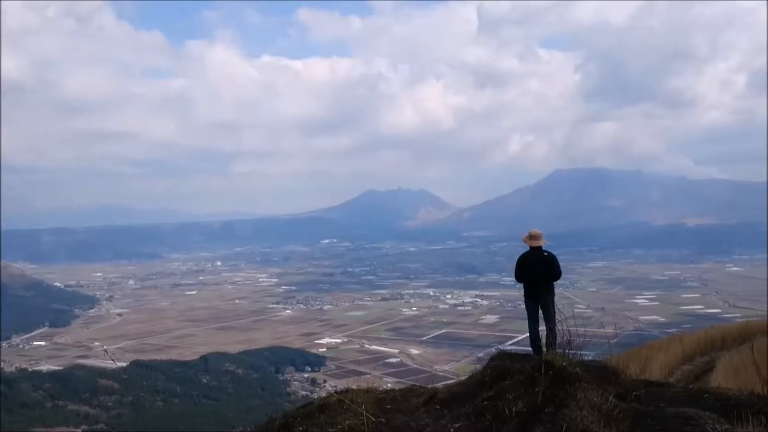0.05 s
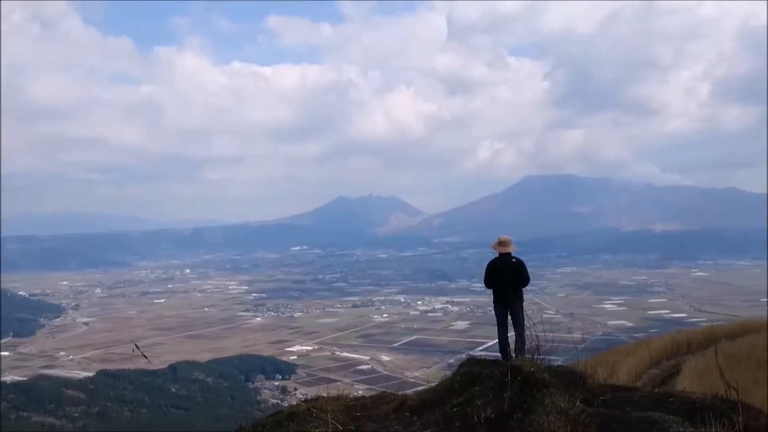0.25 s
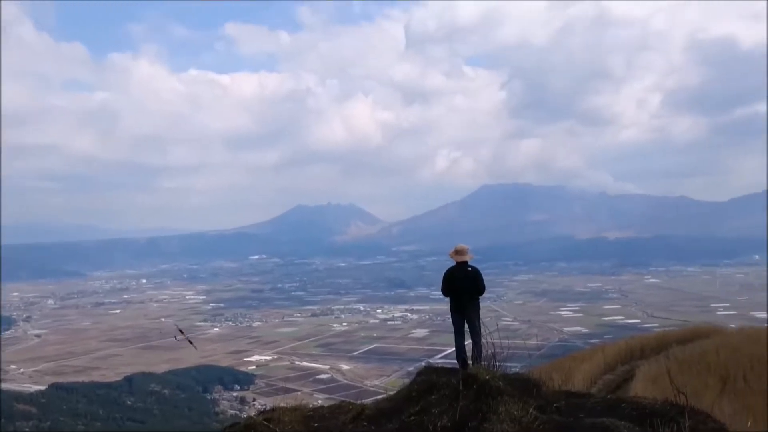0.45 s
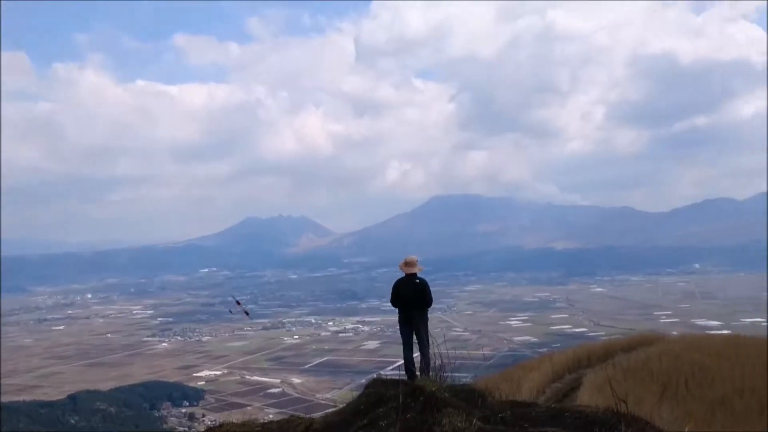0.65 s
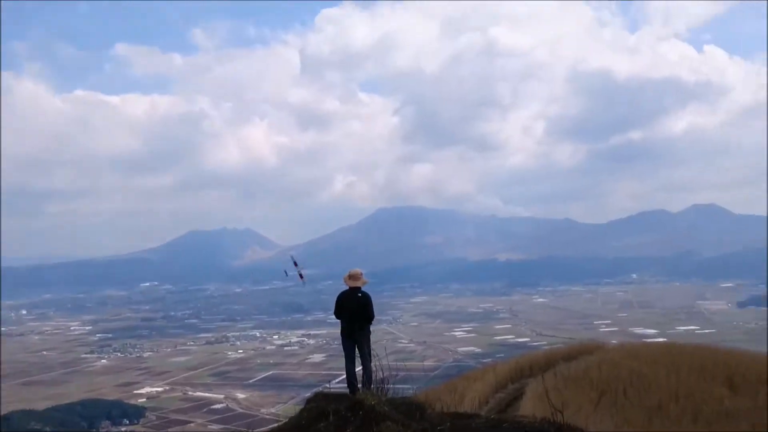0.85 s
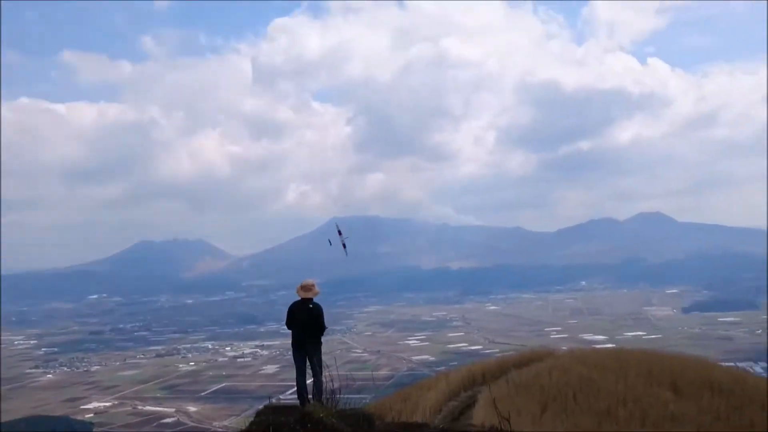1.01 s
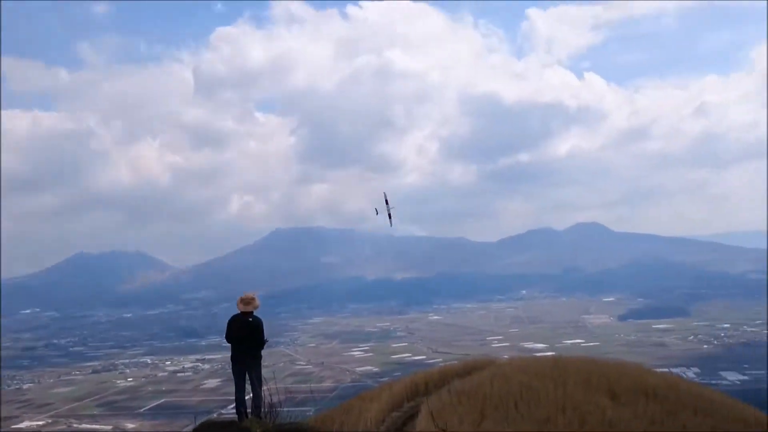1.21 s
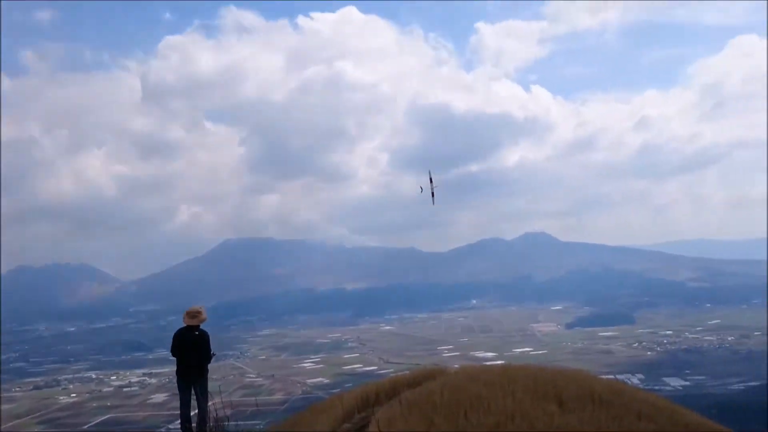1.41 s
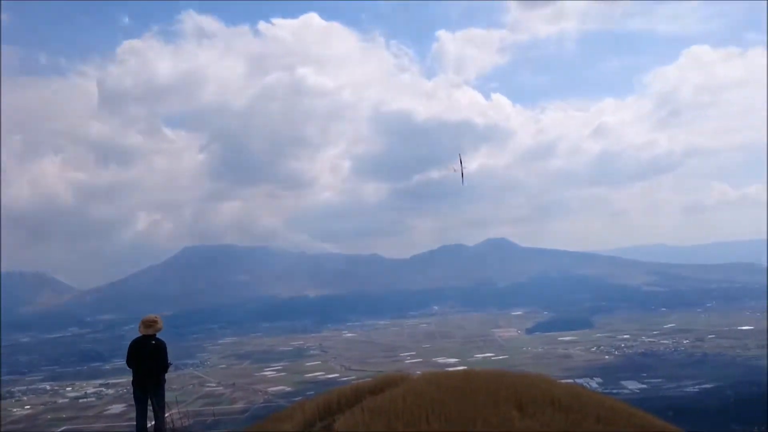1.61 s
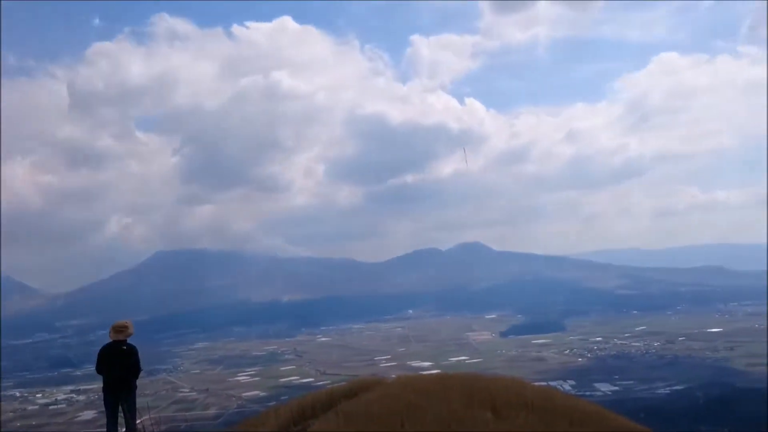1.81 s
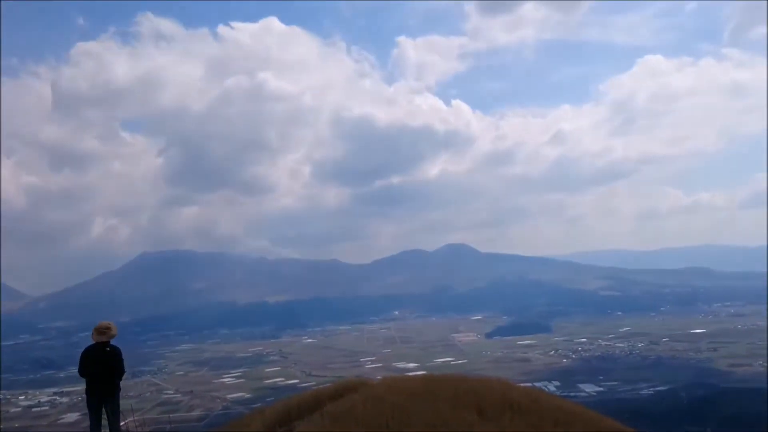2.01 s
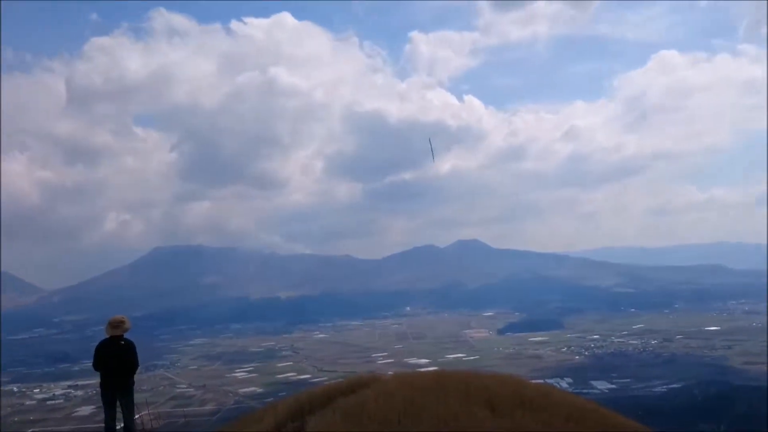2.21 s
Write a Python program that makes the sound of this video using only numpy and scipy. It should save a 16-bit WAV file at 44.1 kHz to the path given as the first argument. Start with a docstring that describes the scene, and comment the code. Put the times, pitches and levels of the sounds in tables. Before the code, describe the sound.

A model glider whooshes past on the right, its airy rush building in quick surges from about 0.2 seconds. High, brief whistles ride on it, loudest near 0.65 seconds and sinking in pitch. Around 1.7 seconds the main whistle returns lower and the rush dies down. A faint puff of wind touches the microphone near 1.9 seconds as the glider fades into soft wind hiss and a faint low drone.

```python
"""A small model glider sweeps past a windy hilltop and climbs away, heard on the right.
From the start, air rushes over its wings in surges, above a soft wind hiss and a faint low drone.
Edges and gaps whistle in the flow, loudest near 0.65 s, sinking in pitch as it passes and slows.
Near 1.7 s the main whistle returns lower and the rush dies down. A puff of wind meets the
microphone near 1.9 s, and the glider fades into the hiss."""
import sys
import numpy as np
from scipy import signal
from scipy.fft import next_fast_len
from scipy.io import wavfile
from scipy.ndimage import uniform_filter1d, map_coordinates

SR = 44100
rng = np.random.default_rng(int(sys.argv[2]) if len(sys.argv) > 2 else 0)


def dump_mix(stems):
    """Bounce the given channels to the path in sys.argv[1] as a 16-bit WAV at rate SR."""
    frames = np.atleast_2d(stems).T  # one column per channel
    limited = np.clip(frames, -1, 1)  # hard clip at full scale
    pcm = np.round(limited * 32767).astype(np.int16)
    wavfile.write(sys.argv[1], SR, pcm)


N = 103635
T = np.arange(N) / SR

# Surges of the rush in three parts, as relative levels: time_s, low_db, middle_db, treble_db
RUSH_SURGES = [(0.0, -87, -49, -58), (0.07, -65, -59, -54.5), (0.105, -80, -61, -61.5),
               (0.16, -58, -54.5, -57.5), (0.225, -62, -47, -52.5), (0.26, -45.5, -39.5, -48.5),
               (0.32, -48, -48, -54), (0.39, -41, -43, -54), (0.44, -61, -42.0, -49.5),
               (0.485, -37, -39.5, -53.5), (0.53, -46.5, -51.0, -57.5), (0.58, -43, -46.5, -53.5),
               (0.63, -40, -39.5, -49.5), (0.67, -45, -32.0, -43), (0.72, -44, -43.5, -52.5),
               (0.77, -48, -40, -54.0), (0.82, -46.5, -49.5, -53.5), (0.86, -33.5, -36, -51.5),
               (0.915, -52, -47.5, -56), (0.965, -35.5, -44.5, -54), (1.01, -39.5, -43.5, -53.5),
               (1.06, -43, -41, -54), (1.12, -51, -45.5, -55), (1.2, -52, -46, -59),
               (1.26, -47, -40.5, -52.5), (1.3, -47.5, -44, -56), (1.37, -50.5, -43, -55.0),
               (1.425, -39, -48.5, -54), (1.485, -54, -47.5, -59), (1.575, -43.5, -45.5, -58),
               (1.63, -48.5, -47, -63), (1.68, -46, -45.5, -56), (1.75, -64.5, -59.5, -68),
               (1.86, -69, -60, -65), (1.96, -75, -62.5, -67), (2.17, -77.0, -67.5, -71.5),
               (2.35, -77.0, -63.5, -74.5)]
# Centres of those three parts: centre_hz
RUSH_CENTRES_HZ = [1720, 2564, 3930]
# Spectral envelope of the rush: frequency_hz, gain_db
RUSH_SPECTRUM = [(800, -27.5), (1000, -22.5), (1200, -15), (1400, -5.5), (1600, -1.5), (1850, 2),
                 (2200, 0.5), (2600, 1), (2950, 1), (3200, 1), (3480, -3), (3900, 0), (4200, -6),
                 (4550, -5.5), (5000, -14), (5400, -12), (5900, -30.5), (7500, -28.5), (9000, -42.5)]
def wing_rush():
    """Turbulence behind the wings radiates broadband noise; its bands surge together, flicker apart."""
    rounding_s, trim_db, flicker_db = 0.024, -1.31, 1.77
    part_widths_hz = [800, 1300, 1100]
    levels = [uniform_filter1d(db, size=int(rounding_s * SR)) for db in in_time(RUSH_SURGES)]
    densities = [db - 10 * np.log10(width) for db, width in zip(levels, part_widths_hz)]
    out, edges = 0, np.geomspace(800, 9000, 33)
    for low, high in zip(edges, edges[1:]):
        hz = np.sqrt(low * high)
        shares = [np.interp(np.log(hz), np.log(RUSH_CENTRES_HZ), row) for row in np.eye(len(levels))]
        surge_db = sum(share * density for share, density in zip(shares, densities))
        gain = from_db(trim_db + surge_db + at_hz(RUSH_SPECTRUM, hz) + flicker_db * drift(24))
        out += shaded(gain * band_noise(low, high), hz)
    return out


# Course of the main whistle: time_s, pitch_hz, level_db, octave_db, roughness (0 to 1)
EDGE_TONE = [(0, 1865, -68.5, -74, .3), (.11, 1870, -72.5, -66, 0.4), (.14, 1875, -57.5, -60.5, 0.42),
             (.235, 1870, -55.5, -54, 0.42), (.27, 1850, -49.5, -49, 0.65), (.33, 1835, -40, -61, 0.64),
             (.37, 1795, -45.5, -67, .6), (.43, 1760, -62, -73, 0.7), (.55, 1815, -70, -75, .6),
             (.6, 1830, -40, -68, 0.2), (.638, 1830, -33.5, -55, 0.42), (.69, 1840, -41.5, -53.5, 0.77),
             (.72, 1790, -40, -48, 0.4), (.755, 1750, -36.5, -56, 0.42), (.785, 1725, -43, -63, 0.4),
             (.82, 1710, -65.5, -77, 0.65), (1.61, 1618, -72.5, -86, 0.8), (1.68, 1611, -42, -56.5, 0.5),
             (1.75, 1570, -61.5, -60, 0.54), (1.81, 1540, -50.5, -68, 0.3), (1.86, 1534, -61, -81, 0.36),
             (1.93, 1528, -66, -62, 0.37), (2.0, 1515, -66, -69, 0.37), (2.1, 1487, -77.5, -74.5, 0.4),
             (2.35, 1500, -89, -87, .3)]
def edge_whistle():
    """Edge tone: flow oscillating at an edge sounds three harmonics, sinking as the airspeed falls."""
    waver, third_harmonic_db = 0.00295, -20.5  # share of the pitch; level relative to the octave
    hz, db, octave_db, rough = in_time(EDGE_TONE)
    hz = hz * (1 + waver * drift(11))
    out = 0
    for k, level_db in enumerate([db, octave_db, octave_db + third_harmonic_db], 1):
        harmonic = from_db(level_db) * tone(k * hz, width_hz=40, rough=rough)
        out += shaded(harmonic, k * hz)
    return out


# Brief whistles of other edges and gaps: start_s, length_s, pitch_hz, level_db
BRIEF_TONES = [(-.04, 0.14, 2960, -53), (-.02, 0.2, 3960, -64), (0.118, 0.044, 2430, -51.5),
               (.22, 0.087, 2940, -44), (0.328, .06, 1530, -45.5), (0.367, 0.048, 1630, -43),
               (.4, 0.11, 2886, -47.5), (0.496, .08, 1680, -52), (.63, 0.0862, 2880, -38.5),
               (0.662, 0.076, 3080, -41.5), (0.835, 0.053, 1582, -41), (0.961, .12, 3966, -56.5),
               (1.03, 0.076, 2530, -43.5), (1.111, 0.069, 2536, -45), (1.129, 0.044, 3980, -57),
               (1.219, 0.081, 2552, -46.5), (1.32, 0.072, 2673, -48.5), (1.391, .07, 2600, -45),
               (1.402, .06, 2190, -44.5), (1.537, .07, 2287, -46.5), (1.646, 0.047, 1740, -48),
               (1.66, 0.056, 3610, -56), (1.681, 0.085, 4380, -65.5), (1.69, 0.098, 2560, -56),
               (2.252, .08, 2490, -68)]
def brief_whistles():
    """Flow-excited tones: other edges and gaps each sound for a moment, sagging slightly in pitch."""
    out, sag_per_s = 0, 0.1
    for start, length, hz, db in BRIEF_TONES:
        pitch = hz * (1 - sag_per_s * (T - start - length / 2))
        whistle = from_db(db) * swell(start, length) * tone(pitch, width_hz=52, rough=0.68)
        out += shaded(whistle, hz)
    return out


# Level difference between the sides: frequency_hz, left_minus_right_db
SHADOW = [(900, -25), (1500, -12), (2300, -17), (3000, -16), (3900, -10), (4600, -21), (5200, -7),
          (5900, 12), (7000, 10.5), (10000, -20)]
def shaded(x, hz):
    """Acoustic shadow: a narrow band from the right is weaker on the left, except around 6-7 kHz."""
    return np.array([x * from_db(at_hz(SHADOW, hz)), x])


# Level and lead of the left side over time: time_s, left_lift_db, left_lead_ms
LEFT_SIDE = [(0, 2, 0.35), (.6, -1, 0.32), (1.2, -1.5, 0.28), (1.65, 0.5, 0.23), (2.35, -5, 0.29)]
def glider():
    """Binaural differences: the left side's level and lead vary; the glider stays on the right."""
    left_phase_rad = 1.3
    left, right = wing_rush() + edge_whistle() + brief_whistles()
    lift_db, lead_ms = in_time(LEFT_SIDE)
    analytic = signal.hilbert(left, next_fast_len(N))[:N]
    left = np.real(analytic * np.exp(1j * left_phase_rad))
    left = map_coordinates(left, [np.arange(N) + lead_ms * SR / 1000], order=3, mode="nearest")
    return np.array([left * from_db(lift_db), right])


# Spectrum of the wind hiss and far rumble, before the fade: frequency_hz, density_db
WIND_SPECTRUM = [(25, -112), (40, -106), (52, -99), (68, -76), (100, -90.5), (150, -92.5), (300, -99),
                 (600, -97), (1000, -97), (2000, -102), (3200, -106), (5000, -109), (8000, -110),
                 (9300, -116), (10400, -131), (12500, -129)]
# Likeness of the wind on the two sides: frequency_hz, correlation (-1 to 1)
WIND_CORRELATION = [(40, -0.59), (100, -0.93), (250, -0.56), (600, -0.16), (1500, -0.17), (8000, -0.19)]
# Slow fade of the wind: time_s, gain_db
WIND_FADE = [(0, -1), (.7, 0), (1.8, -0.16), (2.2, -2.5), (2.35, -3.5)]
def wind():
    """Partial correlation: in-phase and antiphase noise add to a wide, soft, wavering hiss."""
    flicker_db = 1.48
    out, edges = 0, np.geomspace(22, 12750, 23)
    for low, high in zip(edges, edges[1:]):
        hz = np.sqrt(low * high)
        correlation = at_hz(WIND_CORRELATION, hz)
        in_phase = np.sqrt((1 + correlation) / 2) * band_noise(low, high)
        antiphase = np.sqrt((1 - correlation) / 2) * band_noise(low, high) * [[1], [-1]]
        out += from_db(at_hz(WIND_SPECTRUM, hz) + flicker_db * drift(5.3)) * (in_phase + antiphase)
    return out * from_db(in_time(WIND_FADE)[0])


# Partials of the faint low drone: start_s, length_s, pitch_hz, level_db
DRONE_PARTIALS = [(-1.1, 4.4, 65, -73), (-0.54, 1.8, 110, -72), (0.052, 0.52, 210, -74.5)]
def drone():
    """Random modulation makes three low tones waver; the left side is weaker and in antiphase."""
    hum = sum(from_db(db) * swell(start, length) * tone(hz, width_hz=8.8, rough=0.62)
              for start, length, hz, db in DRONE_PARTIALS)
    return np.array([-0.64 * hum, hum])


# Envelope of one puff of wind: time_s, level_db
PUFF_ENVELOPE = [(1.83, -88), (1.88, -79), (1.94, -65.5), (2.0, -78), (2.06, -87)]
def wind_puff():
    """Pressure fluctuations of wind on the microphone make a brief rumble, alike on both sides."""
    return from_db(in_time(PUFF_ENVELOPE)[0]) * rms_one(band_noise(50, 112))


def tone(hz, width_hz, rough):
    """A carrier of unit power, with the share rough squared in noise sidebands around the pitch."""
    body = np.sqrt(2 * (1 - rough ** 2)) + rough * (drift(width_hz) + 1j * drift(width_hz))
    cycles = np.cumsum(hz * np.ones(N)) / SR + rng.random()
    return np.real(body * np.exp(2j * np.pi * cycles))


def band_noise(low_hz, high_hz):
    """Band-passed white noise with unit power per Hz."""
    sos = signal.butter(4, [low_hz, high_hz], "band", fs=SR, output="sos")
    noise = signal.sosfilt(sos, rng.standard_normal(N + SR // 10))[-N:]
    return rms_one(noise) * np.sqrt(high_hz - low_hz)


def drift(rate_hz):
    """Low-passed noise: slow random motion of unit power."""
    step, settling = 40, 2000  # samples per point; points for the filter to settle
    pole = np.exp(-2 * np.pi * rate_hz * step / SR)
    noise = rng.standard_normal(N // step + settling + 2)
    slow = signal.lfilter([1], [1, -2 * pole, pole * pole], noise)[settling:]
    return np.interp(np.arange(N) / step, np.arange(len(slow)), rms_one(slow))


def swell(start_s, length_s):
    """A half-sine envelope."""
    return np.sin(np.pi * np.clip((T - start_s) / length_s, 0, 1))


def in_time(rows):
    """Linear interpolation of each column at every sample."""
    times, *columns = np.transpose(rows)
    return [np.interp(T, times, column) for column in columns]


def at_hz(points, hz):
    """Interpolation of a spectrum on a log-frequency axis."""
    frequencies, values = np.transpose(points)
    return np.interp(np.log(hz), np.log(frequencies), values)


def from_db(db):
    """Decibels to amplitude ratio."""
    return 10 ** (np.asarray(db) / 20)


def rms_one(x):
    """Normalisation to unit power."""
    return x / np.sqrt(np.mean(np.abs(x) ** 2) + 1e-20)


def scene():
    """Superposition: the glider adds to the hilltop's background."""
    return glider() + wind() + drone() + wind_puff()


def record(dry):
    """An elliptic low-pass filter cuts the top treble steeply."""
    cutoff_hz = 12750
    return signal.sosfilt(signal.ellip(10, .1, 70, cutoff_hz, fs=SR, output="sos"), dry)


dry = scene()
out = record(dry)
dump_mix(out)
```